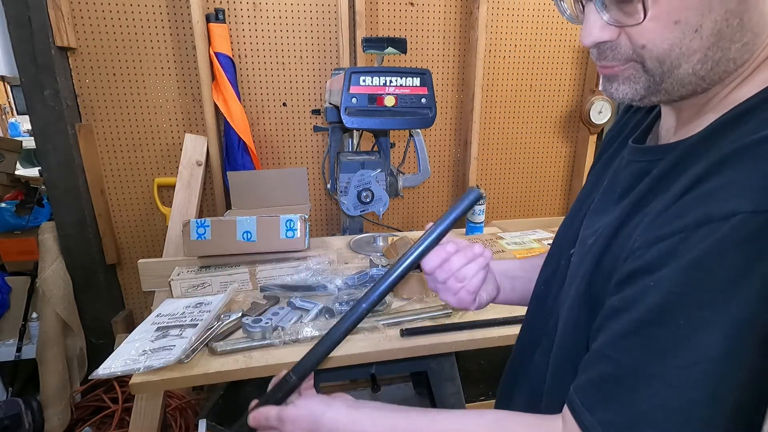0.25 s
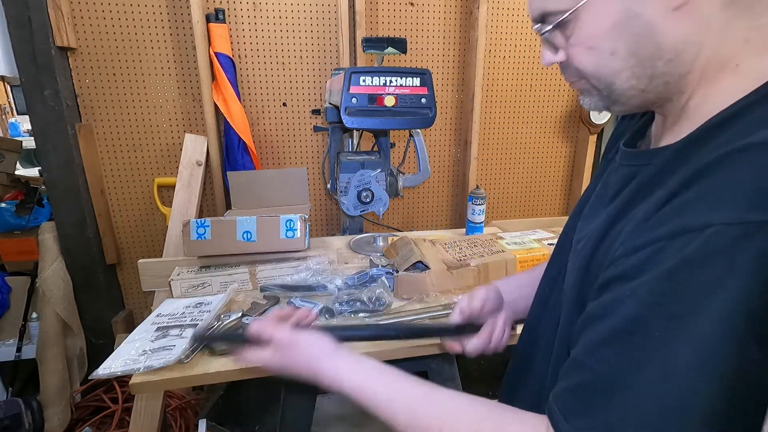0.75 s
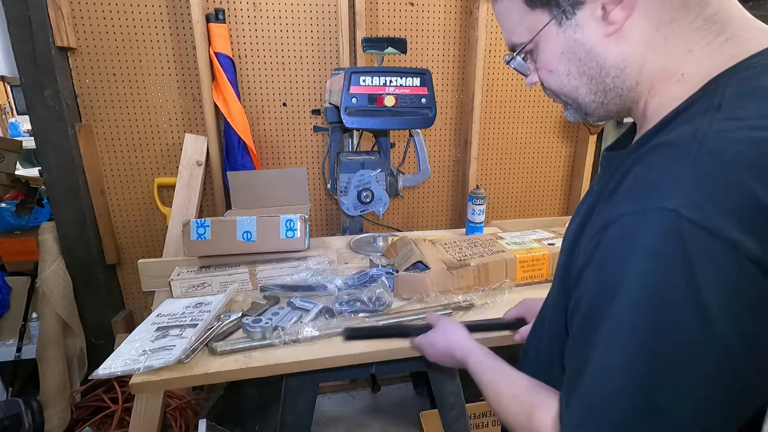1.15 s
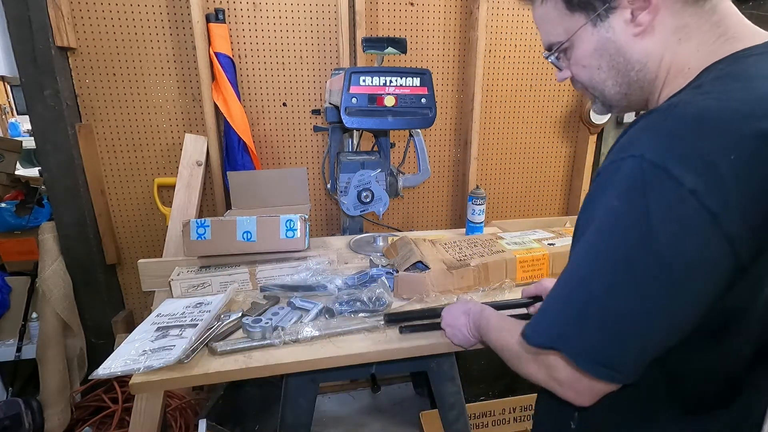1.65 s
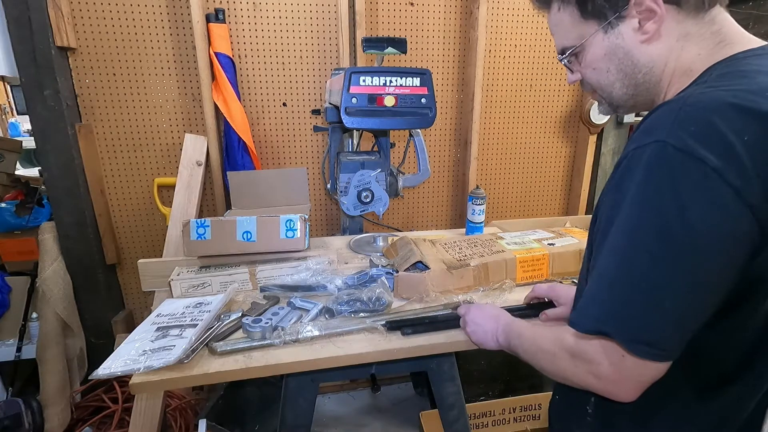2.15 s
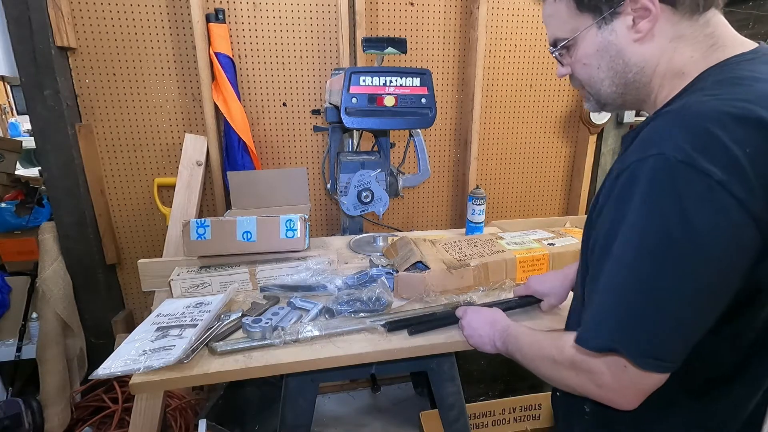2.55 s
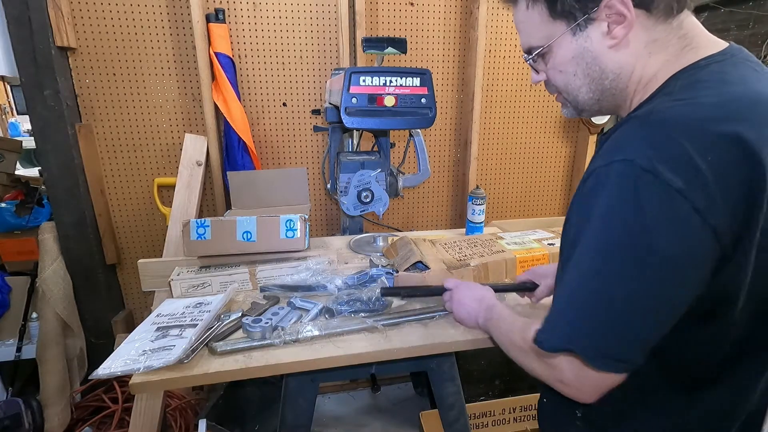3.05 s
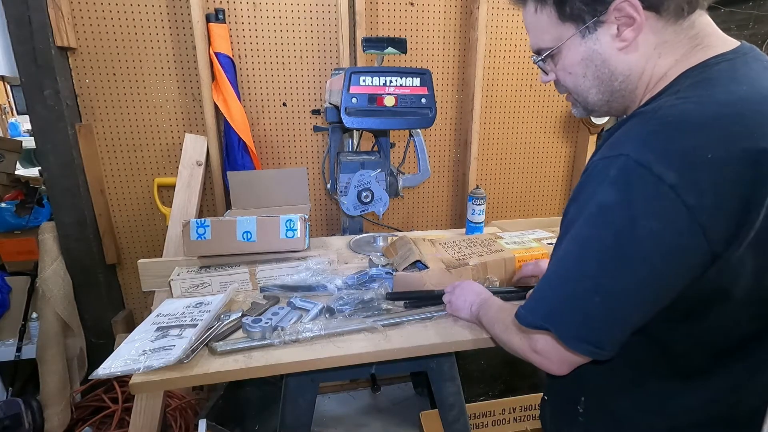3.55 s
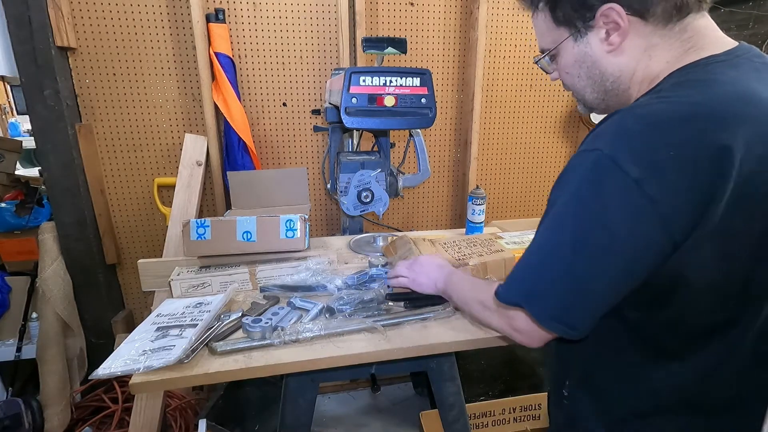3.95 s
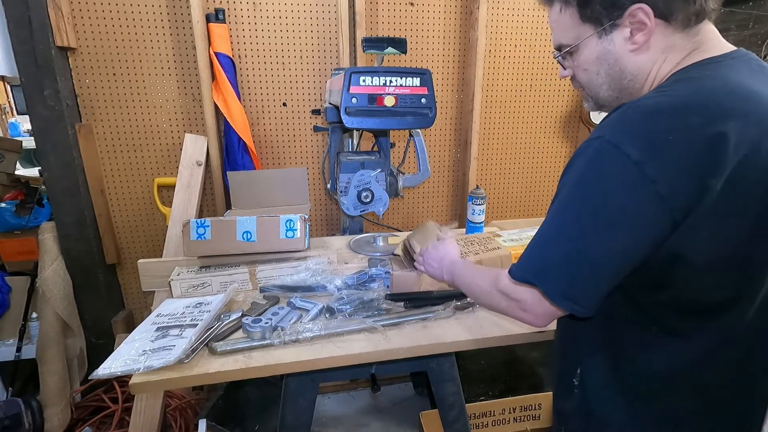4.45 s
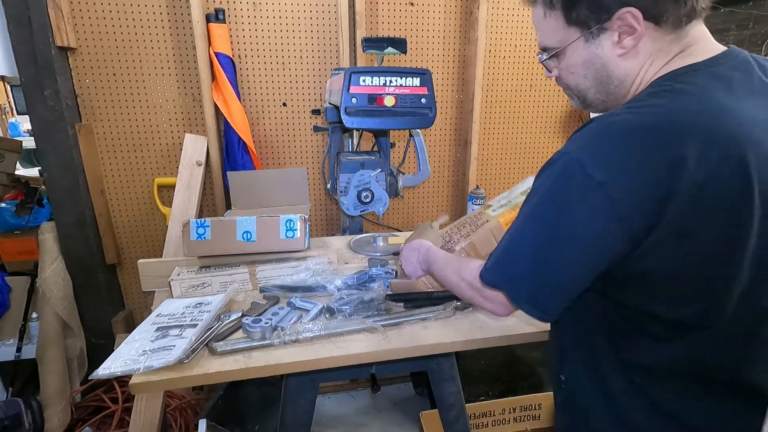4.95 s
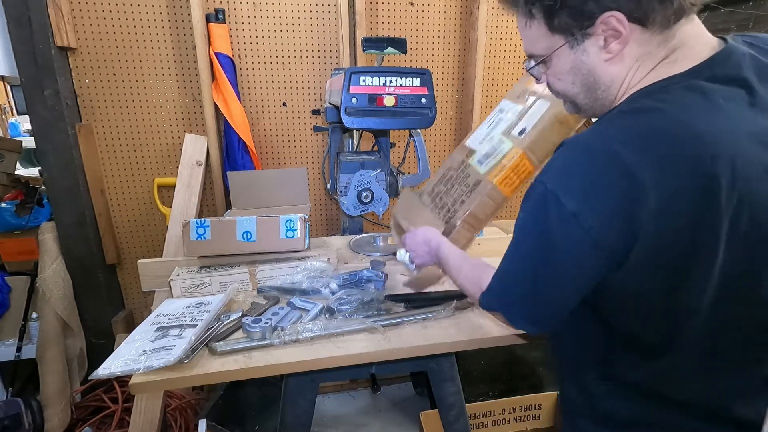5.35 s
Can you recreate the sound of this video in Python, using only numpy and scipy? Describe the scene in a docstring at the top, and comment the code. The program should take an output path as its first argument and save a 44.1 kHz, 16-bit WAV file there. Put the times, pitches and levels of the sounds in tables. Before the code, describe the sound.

Close in a small workshop with a low steady hum, faint handling comes first, then steel tubes land on a wooden bench with hard knocks and a bright clang. Small clinks and a light scrape follow, then a harsher shove into crackling plastic with several clanks. After a near lull, a cardboard carton drags across the bench, rustling and ticking, and ends in a loud metallic jangle and thud.

```python
"""Two steel tubes are laid on a wooden workbench, knocked together and pushed aside among plastic bags;
then a long carton of metal parts is dragged over and shaken. Tubes and parts ring as sums of modes;
blows and friction are shaped noise, passed in part through resonances of the bench top. A low hum of
filtered noise fills the workshop, and decaying noise gives its reflections. The two channels differ slightly."""
import sys
import numpy as np
from scipy import signal
from scipy.fft import rfft, irfft
from scipy.io import wavfile

SR = 44100
rng = np.random.default_rng(int(sys.argv[2]) if len(sys.argv) > 2 else 0)


def dump_mix(stems):
    """Bounce the given channels to the path in sys.argv[1] as a 16-bit WAV at rate SR."""
    frames = np.atleast_2d(stems).T  # one column per channel
    limited = np.clip(frames, -1, 1)  # hard clip at full scale
    pcm = np.round(limited * 32767).astype(np.int16)
    wavfile.write(sys.argv[1], SR, pcm)


N = 246304

# half-octave bands in which the noise of contacts is shaped
EDGES_HZ = 85 * 2 ** np.arange(0, 7.6, .5)
CENTRES_HZ = np.sqrt(EDGES_HZ[1:] * EDGES_HZ[:-1])
BLOW_T = np.arange(int(.3 * SR)) / SR   # time within a blow, s

# light ticks of metal, plastic and card; level before colouring, decay time at 1 kHz:
# [start_s, level_db, hardness_db_per_octave, t60_s, pitch_hz]
TICKS = [(0.7823, -43.5, 3, 0.2, 1460), (0.9536, -21.5, -10, 0.18, 2840), (0.968, -20.5, -1.5, 0.36, 2200),
         (1.009, -22, 9, 0.098, 2080), (1.1313, -40.5, -16.5, 0.26, 2420), (1.3212, -37, 0.1, 0.25, 1410),
         (1.594, -47, 6, 0.12, 1330), (1.7103, -33.5, 3.5, 0.17, 2640), (1.7914, -25, 5, 0.36, 2670),
         (1.8287, -6, -4, 0.072, 2740), (1.8487, -4.5, -5, 0.36, 2450), (2.021, -9, -8.5, 0.068, 3930),
         (2.041, -9, 5, 0.099, 3900), (2.2774, -39, 7, 0.12, 2570), (2.317, -36, -7, 0.12, 1340),
         (2.3686, -26.5, 5, 0.083, 3060), (2.377, -25, 5, 0.12, 2660), (2.4798, -32, 0.1, 0.064, 2660),
         (2.6386, -19, 10, 0.049, 2570), (2.6567, -34, 6, 0.075, 2980), (2.7536, -37, 11, 0.12, 2450),
         (2.7893, -28.5, 6.5, 0.092, 3660), (2.822, -33, 6, 0.12, 2700), (2.8694, -17, -0.3, 0.25, 2540),
         (3.069, -26.5, -2, 0.066, 2450), (3.0928, -24, 1.5, 0.1, 2520), (3.114, -25.5, 7, 0.13, 2380),
         (3.1524, -20.5, -8, 0.36, 2240), (3.2101, -12.5, -2.5, 0.35, 1790), (3.2327, -9, 3.9, 0.35, 1060),
         (3.2669, -10.5, -9, 0.36, 2700), (3.3726, -8, -5.5, 0.075, 2570), (3.5304, -13, 0.1, 0.19, 1990),
         (3.5524, -8, -1, 0.12, 1640), (3.5636, -9.5, 2.5, 0.097, 1000), (3.594, -6, -13, 0.092, 1100),
         (3.6533, -9, 3, 0.13, 1030), (3.861, -51, 12, 0.095, 1000), (3.9656, -53, 10, 0.15, 1040),
         (4.0733, -34, -3, 0.27, 2290), (4.141, -32, -5, 0.11, 1480), (4.1796, -29, -3, 0.065, 3370),
         (4.2024, -32, 5, 0.14, 2830), (4.2192, -24, 1, 0.27, 2720), (4.2603, -27, 0.1, 0.14, 1670),
         (4.303, -27, -3, 0.04, 2920), (4.352, -15.5, -1.5, 0.092, 2600), (4.39, -24, -2, 0.058, 2970),
         (4.419, -25, 6, 0.06, 2980), (4.4262, -19, 3, 0.13, 5540), (4.4358, -25, -15, 0.077, 2680),
         (4.4396, -32, 10, 0.073, 2300), (4.5452, -24, 3, 0.35, 1650), (4.6319, -19.5, -1, 0.052, 1090),
         (4.6647, -25, -4, 0.12, 1150), (4.7215, -23.5, 4.5, 0.095, 1510), (4.8987, -16.5, 1.5, 0.14, 1840),
         (5.0244, -31, 9, 0.099, 1910), (5.0605, -21, -5.5, 0.35, 1270), (5.1049, -22.5, 9, 0.2, 2600),
         (5.1578, -26, -7, 0.36, 1730), (5.2593, -26, 6, 0.056, 1190), (5.3037, -20, -9, 0.12, 1400),
         (5.3931, -1, 3.1, 0.31, 1420), (5.5579, -5, -14, 0.046, 1700)]


def from_db(db):
    """Level to amplitude: 20 dB is a factor of ten."""
    return 10 ** (np.asarray(db) / 20)


def rms_one(x):
    """Normalisation to unit mean power."""
    return x / np.sqrt(np.mean(x ** 2) + 1e-20)


def in_time(rows):
    """Linear interpolation of each column after the time column, one value a sample."""
    s, *columns = np.transpose(rows)
    return np.array([np.interp(np.arange(N) / SR, s, c) for c in columns])


def at_hz(points, hz):
    """Interpolation of a spectrum on a log-frequency axis."""
    points_hz, points_db = np.array(points).T
    return np.interp(np.log(hz), np.log(points_hz), points_db)


def resonances(x, peaks):
    """Parallel two-pole resonators of alternating sign; bandwidth sets the pole radius, level the peak gain."""
    out = 0
    for k, (hz, width_hz, db) in enumerate(peaks):
        r = np.exp(-np.pi * width_hz / SR)
        b = (1 - r * r) / 2 * np.array([1, 0, -1])
        a = [1, -2 * r * np.cos(2 * np.pi * hz / SR), r * r]
        out = out + (-1) ** k * from_db(db) * signal.lfilter(b, a, x)
    return out


def hum():
    """Stationary noise: a wavering low spectrum, with two drones of noise through narrow resonances."""
    # spectrum of the noise before its scaling to unit power: [frequency_hz, density_db]
    spectrum = [(18, -74), (30, -30), (70, -15), (117, -3.5), (152, -9.5), (206, -1.5), (242, -8.5),
                (361, -8), (490, -14.5), (697, -22), (861, -23), (8200, -49.5), (9500, -60), (12000, -59),
                (18000, -120)]
    # drones, relative to the noise and before the band-pass: [frequency_hz, width_hz, level_db]
    drone_peaks = [(124.8, 9.9, -16), (203, 15, -10)]
    hum_db, waver_db, wavers_per_s = -44, .6, 6
    hz = np.maximum(np.fft.rfftfreq(N, 1 / SR), 1)
    noise = rms_one(irfft(rfft(rng.standard_normal(N)) * from_db(at_hz(spectrum, hz)), N))
    waver = np.interp(np.arange(N) / SR * wavers_per_s, np.arange(64), rng.standard_normal(64))
    drones = 0
    for f, width_hz, db in drone_peaks:
        drone = resonances(rng.standard_normal(N), [(f, width_hz, 0)])
        drones = drones + from_db(db) * rms_one(drone)
    drones = signal.sosfilt(signal.butter(2, [80, 320], "band", fs=SR, output="sos"), drones)
    return from_db(hum_db) * (noise * from_db(waver_db * waver) + drones)


def rubbing():
    """Sliding friction: amplitude in each band, from the level and brightness of each gesture."""
    # five gestures: a hand turns the tube, it is laid down, it is nudged along, both are pushed into
    # the bags, the carton is dragged; level before colouring: [time_s, level_db, brightness_db_per_octave]
    gestures = [
        [(0.7, -79, -7), (0.806, -62, 4), (1.02, -51.5, 4.7), (1.45, -69, -4)],
        [(1.58, -71, 0.1), (1.762, -42.5, 1.8), (1.956, -39, -16), (2.008, -34.5, 2), (2.074, -43, 3),
         (2.226, -52, 5), (2.33, -49, -1)],
        [(2.34, -53, 2), (2.434, -40.5, -0.5), (2.942, -48.5, 3.7), (3.04, -60, -1)],
        [(3.05, -54, -2), (3.152, -37, 2), (3.354, -27.5, 3.2), (3.432, -23, -0.3), (3.56, -26.5, 3.3),
         (3.624, -37, 5), (3.778, -47, 3.5), (3.832, -67, 0.1), (3.95, -73, 0.1)],
        [(4.0, -76, 8), (4.11, -49, 3), (4.232, -46.5, 0.5), (4.458, -37, 0.6), (4.882, -36.5, -2.3),
         (5.212, -35.5, 0.7), (5.358, -21, 0.5), (5.494, -25.5, 0.5), (5.585, -28.5, 1)],
    ]
    # spectrum of the rubbing: [frequency_hz, level_db]
    colour = [(250, -23), (500, -14), (900, -10.5), (1600, -3), (2500, -1.5), (4000, -6.5), (5500, -11),
              (11000, -24)]
    level_db, bright_db = in_time(np.concatenate(gestures))
    for hz in CENTRES_HZ:
        tilt_db = bright_db * np.log2(max(hz, 900) / 2500)
        yield from_db(level_db + at_hz(colour, hz) + tilt_db)


def rumble():
    """Forced vibration: the bench top rumbles under whatever rolls, rocks or slides on it; amplitude by band."""
    # four spells, level before colouring: [time_s, level_db]
    spells = [
        [(1.6, -58), (1.726, -41), (1.864, -49), (1.996, -25.5), (2.044, -15), (2.14, -24.5), (2.186, -33),
         (2.3, -62)],
        [(2.33, -63), (2.474, -35), (2.75, -49)],
        [(3.12, -64), (3.224, -34), (3.382, -53), (3.612, -41), (3.692, -48), (3.836, -40), (3.95, -58)],
        [(4.02, -59), (4.32, -45), (4.564, -41.5), (5.234, -38), (5.37, -40), (5.5, -23), (5.585, -21)],
    ]
    # spectrum of the rumble: [frequency_hz, level_db]
    colour = [(120, -16.5), (250, -0.5), (500, -7), (900, -8), (1600, -21.5), (3000, -37), (11000, -61)]
    t = np.arange(N) / SR
    level_db = np.maximum.reduce([np.interp(t, *np.transpose(rows), -90, -90) for rows in spells])
    for hz in CENTRES_HZ:
        yield from_db(level_db + at_hz(colour, hz))


def friction_grains(white):
    """Stick-slip as shot noise: random grains of uneven size, in bunches, over a little steady noise."""
    grains_per_s, grain_spread_db = 2500, 4   # rate before bunching
    clump_db, clumps_per_s = 4, 70
    steps = np.arange(N) / SR * clumps_per_s
    bunches = np.interp(steps, np.arange(1000), rng.standard_normal(1000))
    chance = grains_per_s * from_db(clump_db * bunches) / SR
    size = from_db(grain_spread_db * np.minimum(rng.exponential(1, (2, N)), 5))
    grains = (rng.random((2, N)) < chance) * size
    return rms_one(grains * np.sign(white)) + 0.36 * white[::-1]


def blows():
    """Impact as a brief crack on dying noise: amplitude by band, strongest near each blow's own pitch."""
    # heavy knocks on the bench top; level before colouring, decay time at 1 kHz:
    # [start_s, level_db, hardness_db_per_octave, t60_s, pitch_hz]
    knocks = [(0.921, -30.5, 5.1, 0.56, 151), (1.648, -28, -0.7, 0.22, 223), (1.743, -24.5, 2.2, 0.38, 334),
              (1.826, -4.5, 2.9, 0.14, 853), (1.836, -1, 0.1, 0.19, 191), (1.847, -28, 0.1, 0.31, 760),
              (1.918, 0.5, -0.5, 0.23, 380), (2.044, -4, -3, 0.25, 148), (2.375, -18.5, -0.1, 0.29, 397),
              (2.478, -30, 6.4, 0.6, 1290), (3.239, -6.5, 0.1, 0.13, 950), (3.372, -30, 12.1, 0.085, 1290),
              (3.564, -7.5, 2, 0.35, 900), (3.592, -6, -3, 0.21, 990), (3.652, -11.5, 3, 0.22, 950),
              (3.666, -7, -1.2, 0.33, 950), (3.696, -13.5, -0.2, 0.32, 929), (4.049, -25.5, 1.2, 0.14, 533),
              (4.542, -22.5, 0.1, 0.44, 188), (4.63, -23, 0.1, 0.067, 1080), (4.718, -22, -1, 0.15, 355),
              (5.16, -24.5, -2, 0.57, 353), (5.226, -28, 9.5, 0.12, 1270), (5.303, -16, -9.5, 0.42, 346),
              (5.324, -9.5, -0.2, 0.54, 322), (5.383, -8.5, -9, 0.1, 272), (5.537, 0, 1.2, 0.083, 550),
              (5.555, -11, 3.5, 0.18, 930)]
    # spectra of knocks and ticks: [frequency_hz, level_db]
    knock_colour, tick_colour = [(120, -8.5), (250, -11.5), (500, -17), (900, -13.5), (1600, -20),
                                 (2500, -25.5), (5500, -44.5), (11000, -77)], [(250, -36.5), (900, -33), (1600, -19), (2500, -15),
                                                       (4000, -22.5), (5500, -26), (8000, -34),
                                                       (11000, -53)]
    # first crack: [level_over_dying_noise_db, time_constant_s]
    knock_crack, tick_crack = (0.5, 0.0015), (4.7, 0.0015)
    hump_db, hump_octaves = 4, 0.23
    struck = np.full((len(CENTRES_HZ), N + len(BLOW_T)), 1e-9)
    lows_last = (1000 / CENTRES_HZ[:, None]) ** 0.031   # lows last longer
    for rows, colour, middle_hz, (crack_db, crack_s) in [(knocks, knock_colour, 500, knock_crack),
                                                         (TICKS, tick_colour, 2500, tick_crack)]:
        crack = from_db(crack_db) * np.exp(-BLOW_T / crack_s)
        for s, db, hardness_db, t60, pitch_hz in rows:
            dying = from_db(-60 * BLOW_T / (t60 * lows_last)) + crack
            tilt_db = hardness_db * np.log2(np.maximum(CENTRES_HZ / middle_hz, .4))
            near_pitch_db = hump_db * np.exp(-(np.log2(CENTRES_HZ / pitch_hz) / hump_octaves) ** 2)
            band_db = db + at_hz(colour, CENTRES_HZ) + tilt_db + near_pitch_db
            struck[:, round(s * SR):][:, :len(BLOW_T)] += from_db(band_db)[:, None] * dying
    return struck[:, :N]


def tick_pings():
    """Free vibration at constant damping ratio: each tick's sine falls 60 dB in 40 cycles."""
    out = np.zeros(N + len(BLOW_T))
    ping_db = -5   # against the level of the tick
    for s, db, _, _, hz in TICKS:
        fall_db = 60 * BLOW_T * hz / 40
        ping = from_db(db + ping_db - fall_db) * np.sin(2 * np.pi * hz * BLOW_T)
        out[round(s * SR):][:len(BLOW_T)] += ping
    return out[:N]


def bench(x):
    """Resonance of a plate: the bench top adds its own modes to each contact."""
    # pitches of the bench-top modes: frequency_hz
    mode_hz = [150, 187, 270, 375, 480, 749, 1179, 1567]
    # the same modes, level before the common gain: [width_hz, level_db]
    mode_shape = [(30.3, -1), (28, -13), (12, -19), (17.9, -38), (17.2, -10), (18, 5), (20, -33), (29, -27)]
    peaks = [(hz, *shape) for hz, shape in zip(mode_hz, mode_shape)]
    x = x + 1.21 * resonances(x, peaks)
    # the bench is too small for deep bass
    return signal.sosfilt(signal.butter(4, 115, "high", fs=SR, output="sos"), x)


def contacts():
    """Band-wise noise synthesis: blows and friction shape filtered noise, pings join, the bench responds."""
    # spectrum common to all contacts, over equal power an octave: [frequency_hz, level_db]
    fine_colour = [(100, -29.5), (170, -11.5), (400, -1), (1500, -3.5), (3500, -0.5), (5000, 0),
                   (8000, 3.5), (11000, -0.5), (14000, -19)]
    white = rng.standard_normal((2, N))
    grains = friction_grains(white)
    out = tick_pings()
    for k, (hz, struck, rubbed, rumbling) in enumerate(zip(CENTRES_HZ, blows(), rubbing(), rumble())):
        sos = signal.butter(2, [EDGES_HZ[k], EDGES_HZ[k + 1]], "band", fs=SR, output="sos")
        even = np.sqrt(SR / 2 / hz) * from_db(at_hz(fine_colour, hz))
        excitation = white[k % 2] * struck + grains[k % 2] * (rubbed + rumbling)
        out = out + even * signal.sosfilt(sos, excitation)
    return bench(out)


def flutter(count):
    """Band-limited chance: random values of unit spread joined by lines, half a second long."""
    steps = np.arange(SR // 2) / SR * 35   # 35 values a second
    return [np.interp(steps, np.arange(64), row) for row in rng.standard_normal((count, 64))]


def tubes():
    """Modal synthesis: decaying, beating pairs; soft contacts weaken high modes, a hand damps them most."""
    # blows that ring the steel; place is 0 at the end, 1 at the side; a hand stills the tubes after *_free_s:
    # [start_s, tube_a_db, tube_b_db, bar_db, place, contact_cutoff_hz, a_free_s, b_free_s,
    #  bench_loss_db_per_s (up to 2500 Hz, less above)]
    clanks = [(1.829, -22, -23, -28, .1, 9000, .16, .09, 80), (2.022, -15, -16, -42, 0, 30000, .3, .24, 0),
              (2.11, -45, -32, -60, .6, 6000, .2, .17, 5), (2.225, -45, -30, -70, .5, 3000, .08, .04, 30),
              (2.29, -32, -45, -70, .5, 1700, .08, .05, 5), (2.379, -21, -36, -48, .5, 2700, .075, .04, 20),
              (2.478, -25, -38, -52, .5, 2900, .15, .1, 10),
              (2.868, -28, -28, -60, .5, 6000, .05, .05, 250),
              (3.244, -50, -50, -16, .5, 2000, .03, .1, 150), (3.595, -50, -50, -15, .9, 3000, .1, .1, 60),
              (3.601, -13, -17, -60, 1, 30000, .31, .22, 75), (3.666, -40, -40, -17, .99, 3000, .2, .1, 30),
              (5.537, -50, -50, -22, .5, 2000, .1, .1, 30)]
    # bending modes of tube A, tube B and a flat bar beside them: frequency_hz
    mode_hz = [
        [1322, 2509, 4091, 5969, 8075, 10455, 13068],
        [2397, 3851, 5630, 7681, 9986, 12510, 14013],
        [940],
    ]
    # the close twin that beats with each mode: offset_hz
    twin_offset_hz = [
        [-9, 12, -7, 13, 13, -12, -8],
        [-12, 7, 14, 9, 14, -8, 9],
        [-25],
    ]
    # the same modes: [twin_db, t60_s, end_blow_db, side_blow_db]
    mode_ring = [
        [(-7, 1.0, -13, -14), (-14, .8, -7, -9), (-5, .6, -5, -11), (-11, .8, -11, -24), (-8, .9, -14, -29),
         (-6, .55, -31, -33), (-6, .5, -47, -50)],
        [(-6, .35, -8, -13), (-2, .6, -3, -19), (-12, .8, -14, -8), (-20, .38, -6, -30), (-20, .5, -22, -34),
         (-5, .45, -42, -48), (-10, .4, -40, -55)],
        [(-4, .45, 0, 0)],
    ]
    flutter_db = 2.8   # the tubes rock and brush the bench while they ring
    out, t = np.zeros(N + SR), np.arange(SR // 2) / SR
    for s, a_db, b_db, bar_db, place, cut_hz, a_free_s, b_free_s, loss_db in clanks:
        bodies = [(a_db, a_free_s), (b_db, b_free_s), (bar_db, a_free_s)]
        for body, (blow_db, free_s) in enumerate(bodies):
            held_s = np.maximum(t - free_s, 0)
            modes = zip(mode_hz[body], twin_offset_hz[body], mode_ring[body], flutter(count=7))
            for hz, twin_hz, (twin_db, t60, end_db, side_db), rocking in modes:
                place_db = (1 - place) * end_db + place * side_db
                bench_db_per_s = loss_db * 2500 / max(hz, 2500)   # the bench drains the low modes
                hand_db_per_s = .2 * max(hz - 2200, 250)
                fall_db = (60 / t60 + bench_db_per_s) * t + hand_db_per_s * held_s
                level_db = blow_db + place_db + flutter_db * rocking - fall_db
                softness = 1 / (1 + (hz / cut_hz) ** 4)
                twin = from_db(twin_db) * np.sin(2 * np.pi * (hz + twin_hz) * t)
                pair = np.sin(2 * np.pi * hz * t) + twin
                out[round(s * SR):][:len(t)] += from_db(level_db) * softness * pair
    return out[:N]


def carton():
    """Sustained modes with phase diffusion: rubbing keeps loose parts ringing while it jolts their phases."""
    # shaking of the carton: [time_s, low_group_db, high_group_db]
    shake = [(5.288, -74, -82), (5.31, -39, -61), (5.35, -24.5, -42), (5.4, -22.5, -34), (5.44, -34, -39),
             (5.469, -43, -25.5), (5.52, -56, -33.5), (5.545, -52, -35)]
    # parts shifting inside, a low and a high group: frequency_hz
    parts_hz = [
        [1359, 1397, 2676, 4124, 4974, 6682, 6950],
        [3429, 3467, 4412, 4443, 6682, 7208, 7913, 9373, 11385, 12604],
    ]
    # the same parts, relative to their group: level_db
    parts_level_db = [
        [2, -4.5, -1, -5.5, -29, -9, -9],
        [-2, -9, 1.5, -1, -2, -10, -18, -18, -31, -36],
    ]
    wander_rad = .045   # spread of the phase jolt at each sample
    start, end = round(shake[0][0] * SR), round(shake[-1][0] * SR)
    out, t = np.zeros(N), np.arange(N // 10) / SR
    for level_db, pitches, parts_db in zip(in_time(shake), parts_hz, parts_level_db):
        jolts = wander_rad * np.cumsum(rng.standard_normal((len(pitches), len(t))), axis=1)
        rings = from_db(parts_db) @ np.sin(2 * np.pi * np.outer(pitches, t) + jolts)
        out[start:end] += from_db(level_db[start:end]) * rings[:end - start]
    return out


def workshop(x):
    """Diffuse reverberation: convolution with exponentially decaying, dulled noise that starts 6 ms late."""
    t60_s, level_db, cut_hz = 0.31, -12, 14000
    t = np.arange(int(.5 * SR)) / SR
    tail = rng.standard_normal(len(t)) * from_db(-60 * t / t60_s) * (t > .006)
    tail = signal.lfilter(*signal.butter(1, cut_hz, fs=SR), tail)
    return from_db(level_db) * signal.fftconvolve(x, tail / np.sqrt(np.sum(tail ** 2)))[:N]


def unlike(x):
    """Decorrelation: the part that differs between channels is the sound smeared over a few milliseconds."""
    # filter on the smeared sound, strongest at both ends: [frequency_hz, level_db]
    spectrum = [(60, -35), (110, -41.5), (200, -81), (360, -63), (660, -64), (1210, -56), (2210, -59),
                (4040, -42), (7360, -33.5), (13400, -2.5)]
    smear = rng.standard_normal(256) * np.hanning(256)
    smear = smear / np.sqrt(np.sum(smear ** 2))
    hz = np.maximum(np.fft.rfftfreq(N, 1 / SR), 1)
    return irfft(rfft(x) * rfft(smear, N) * from_db(at_hz(spectrum, hz)), N)


def scene():
    """Superposition: sources and reflections add; channels differ slightly and each adds a faint hiss."""
    knocks, rings = contacts(), tubes() + carton()
    to_room = knocks + .3 * rings   # share of the ringing that returns from the walls
    heard = knocks + rings + workshop(to_room) + hum()
    # differencing tilts the hiss toward the treble
    hiss = signal.lfilter([1, -1], [1], rng.standard_normal((2, N)))
    return heard + unlike(heard) * [[1], [-1]] + from_db(-100) * hiss


def record(dry):
    """Microphone response: a wide and a narrow treble dip, no deep bass, rounded peaks and a steep top cut."""
    # resonance subtracted from the sound: [frequency_hz, width_hz, subtracted_db]
    treble_dip = [(8400, 4700, -5)]
    notch_hz, notch_width_hz = 9100, 600
    x = dry - resonances(dry, treble_dip)
    x = signal.lfilter(*signal.iirnotch(notch_hz, notch_hz / notch_width_hz, fs=SR), x)
    x = signal.sosfilt(signal.butter(2, 60, "high", fs=SR, output="sos"), x)
    top_cut = signal.cheby2(12, 50, 14400, fs=SR, output="sos")   # 50 dB down from 14.4 kHz
    return signal.sosfilt(top_cut, np.tanh(x))


dry = scene()
out = record(dry)
dump_mix(out)
```